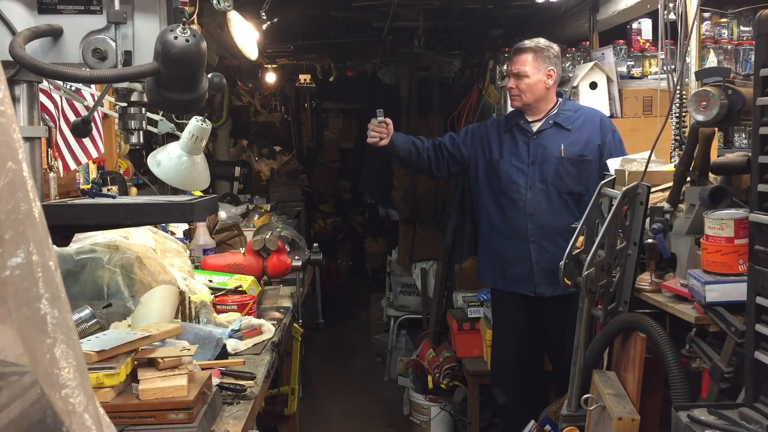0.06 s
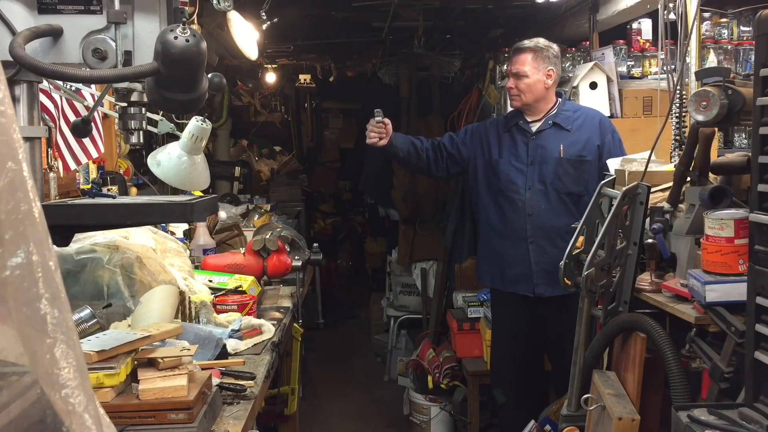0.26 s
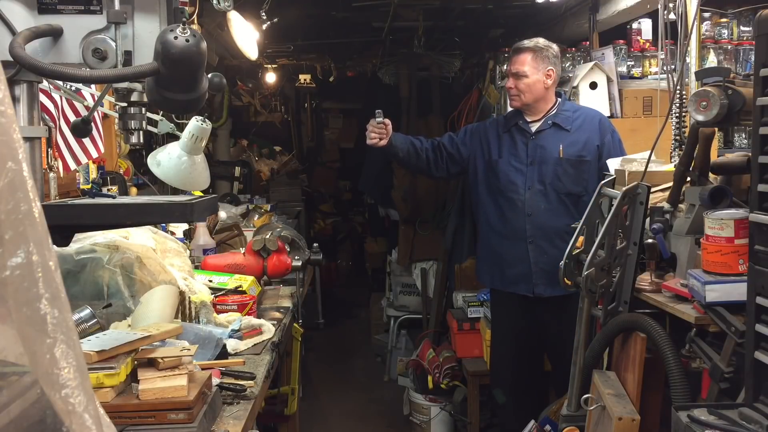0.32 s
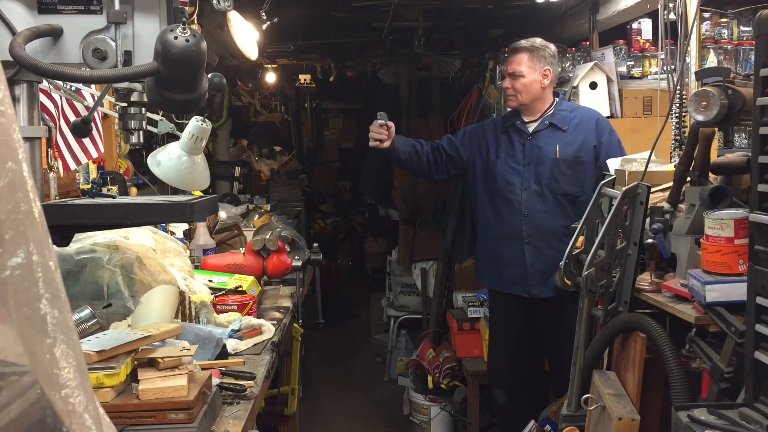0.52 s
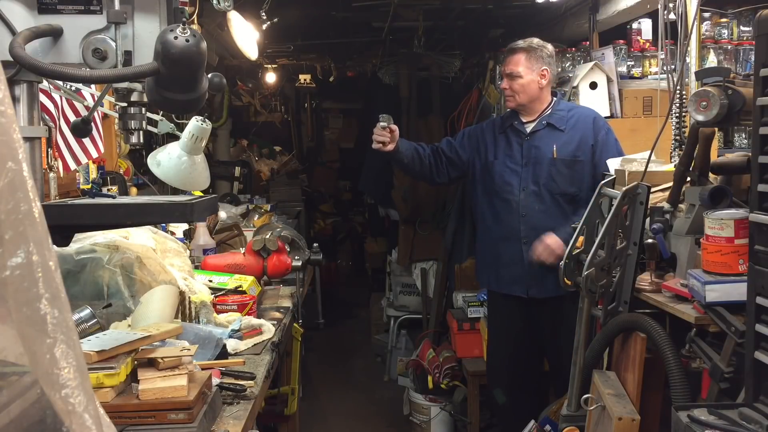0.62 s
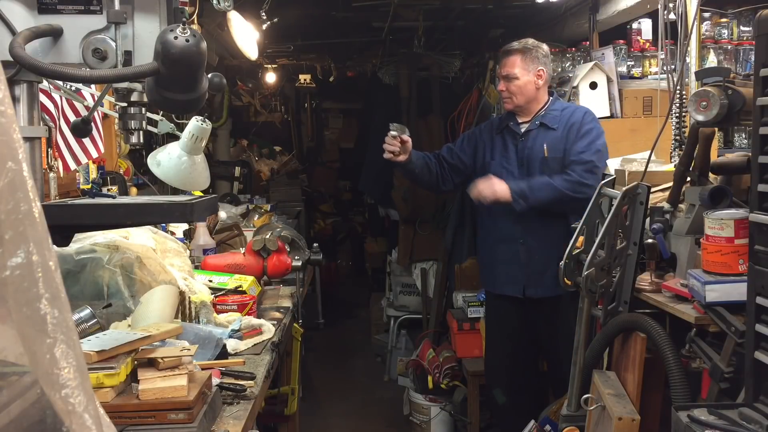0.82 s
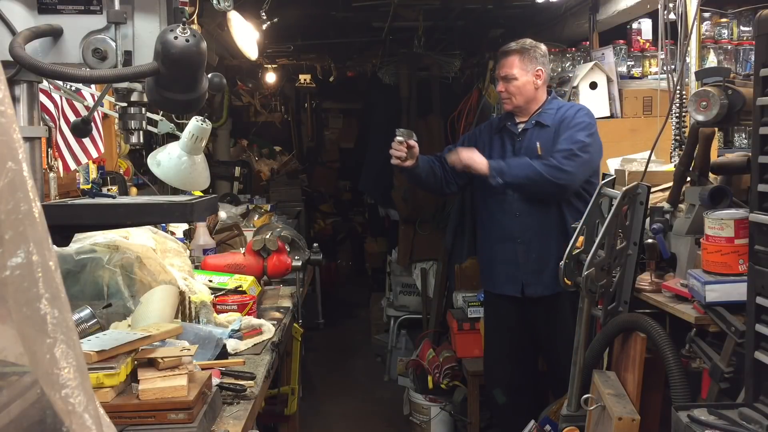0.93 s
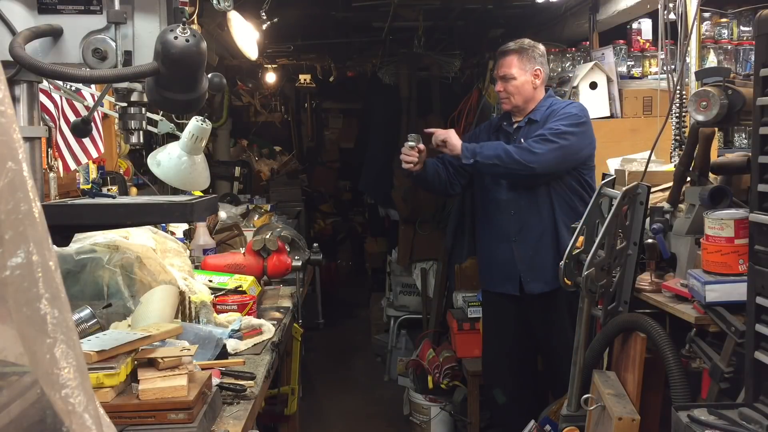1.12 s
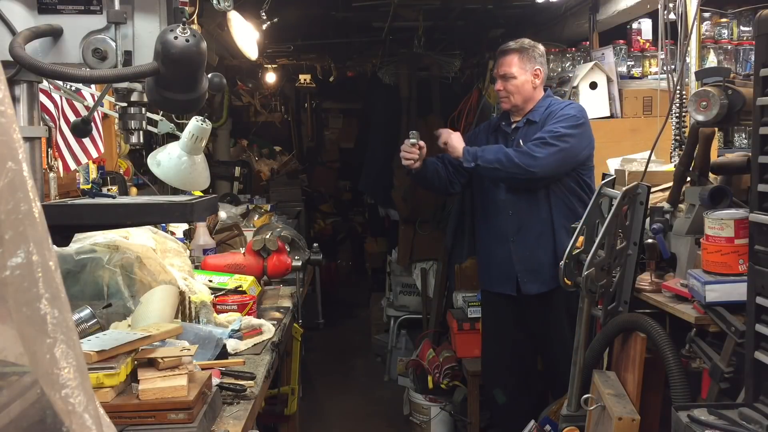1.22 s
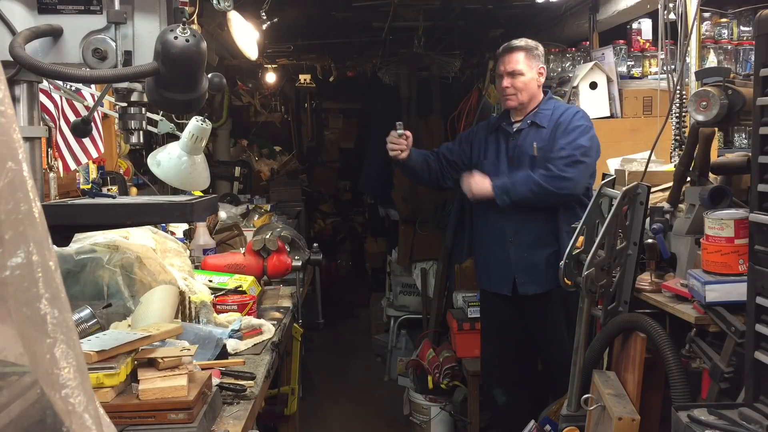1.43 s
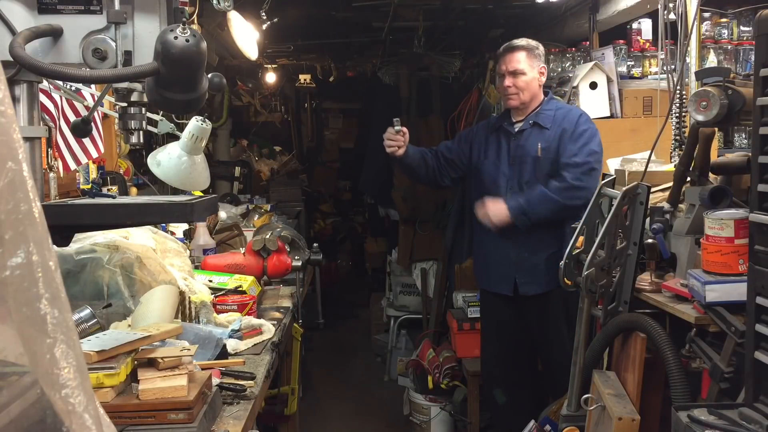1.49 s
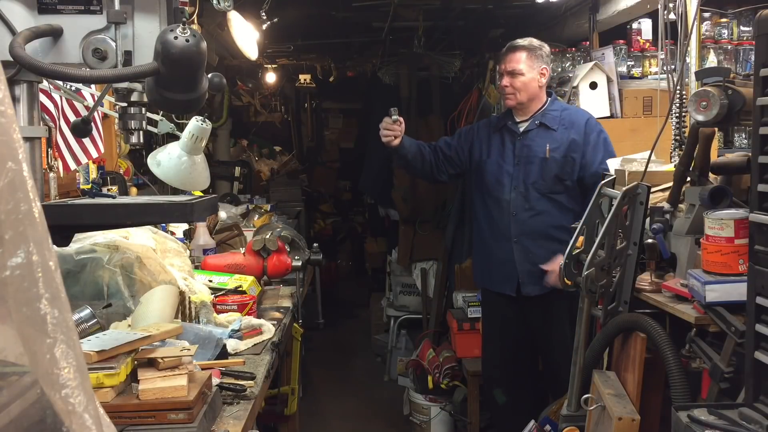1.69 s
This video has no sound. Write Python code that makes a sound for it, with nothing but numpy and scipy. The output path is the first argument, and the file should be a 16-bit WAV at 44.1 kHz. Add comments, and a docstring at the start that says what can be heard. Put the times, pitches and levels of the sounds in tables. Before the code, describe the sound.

One loud, sharp toy pistol pop, followed by a light trigger click indoors.

```python
"""A toy air pistol bursts its paper strip.

In a cluttered workshop, over a low rumble and faint hiss, the trigger rubs and ticks as it is squeezed.
The catch slips, the spring drives the piston, and the paper bursts with a pop that reverberates
and overloads the microphone. The trigger slides back and clicks home; a sleeve brushes."""
import sys
import numpy as np
from scipy import signal
from scipy.fft import rfft, irfft
from scipy.io import wavfile

SR = 44100
rng = np.random.default_rng(int(sys.argv[2]) if len(sys.argv) > 2 else 0)


def to_wav(s):
    """Save 16-bit WAV."""
    ch = np.atleast_2d(s).T  # columns
    pcm = np.round(np.clip(ch, -1, 1) * 32767)  # PCM
    wavfile.write(sys.argv[1], SR, pcm.astype(np.int16))


N = 77175
TIME = np.arange(N) / SR
FREQS = np.maximum(np.fft.rfftfreq(N, 1 / SR), 1)
POP_S = .2087

# Colour of the shot's reverberation. Each row: frequency in Hz, relative spectral density in dB.
REVERB_SPECTRUM = [(200, -14), (450, -14.5), (900, -10.5), (1300, -9.5), (1800, -3), (2600, -2),
                   (3600, 1.5), (5000, 2), (7500, 6), (9200, 3), (10500, -8), (13000, -5), (16000, -16.5)]


def from_db(db):
    """Amplitude grows tenfold for every 20 dB."""
    return 10 ** (np.asarray(db) / 20)


def level(points):
    """Gain over time, interpolated in decibels between (seconds, dB) points."""
    return from_db(np.interp(TIME, *np.transpose(points)))


def unit_rms(x):
    """Normalisation to a mean power of 1."""
    return x / np.sqrt(np.mean(x ** 2) + 1e-20)


def noise(spectrum):
    """Spectral shaping: white noise coloured by (Hz, dB) points, at rms 1."""
    hz, db = np.transpose(spectrum)
    gain = from_db(np.interp(np.log(FREQS), np.log(hz), db))
    return unit_rms(irfft(rfft(rng.standard_normal(N)) * gain, N))


def burst(start, hold, t60):
    """Exponential decay: a sudden onset, a hold, then a fall of 60 dB every t60 seconds."""
    return (TIME >= start) * np.exp(-np.log(1000) * np.maximum(TIME - start - hold, 0) / t60)


def swell(start, attack):
    """First-order rise towards 1, with time constant attack in seconds."""
    return 1 - np.exp(-np.maximum(TIME - start, 0) / attack)


def gaussian(centre_s, width_s):
    """A Gaussian envelope: a smooth, symmetric rise and fall."""
    return np.exp(-((TIME - centre_s) / width_s) ** 2)


def resonator(x, hz, t60):
    """A damped mode: a unit impulse starts a decaying sine of amplitude 1."""
    radius = np.exp(-np.log(1000) / (t60 * SR))
    angle = 2 * np.pi * hz / SR
    return signal.lfilter([0, np.sin(angle)], [1, -2 * radius * np.cos(angle), radius ** 2], x + 1e-18)


def reverberation(start, spectrum, build_s):
    """A diffuse field: reflections build up, then each band decays at the room's own rate."""
    # Each row: band centre in Hz, reverberation time in seconds.
    decay_times = [(200, .1), (600, .125), (1400, .148), (3500, .137), (7000, .124), (10000, .113),
                   (13000, .102)]
    field = rfft(noise(spectrum))
    log_centres = np.log([hz for hz, _ in decay_times])
    tail = 0
    for weights, (_, t60) in zip(np.eye(len(decay_times)), decay_times):
        band = irfft(field * np.interp(np.log(FREQS), log_centres, weights), N)
        tail += band * burst(start, build_s, t60)
    return swell(start, build_s) * tail


def background():
    """Ambient noise: a low rumble and a faint hiss, which both sink after the pop and come back."""
    # Each row: time in seconds, level in dB.
    rumble_levels = [(0, -52.5), (.03, -43.5), (.065, -59.5), (.115, -42), (.29, -58.5), (.42, -66),
                     (.815, -60), (.84, -49.5), (.98, -45.5), (1.05, -49), (1.5, -48.5), (1.75, -48)]
    hiss_levels = [(0, -72), (.2, -70), (.38, -78.5), (.66, -77), (.9, -72), (1.1, -71.5), (1.75, -72)]
    # Each row: frequency in Hz, relative spectral density in dB.
    rumble_spectrum = [(20, -17.5), (35, -16), (58, 4.5), (75, 1), (105, -9.5), (180, -21.5), (270, -31.5),
                       (450, -44), (1000, -64)]
    hiss_spectrum = [(100, -7.5), (400, -3), (600, -6.5), (1030, -8), (1600, -9.5), (2600, -10),
                     (6000, -15.5), (9000, -17.5), (11000, -21), (15500, -23), (17000, -35)]
    return level(rumble_levels) * noise(rumble_spectrum) + level(hiss_levels) * noise(hiss_spectrum)


def sleeve():
    """Friction of cloth: one soft brush as the arm comes in."""
    # Each row: frequency in Hz, relative spectral density in dB.
    cloth_spectrum = [(40, -22), (100, -7), (180, 2.5), (350, -16), (800, -25), (1400, -16), (2500, -24),
                      (8000, -41)]
    return from_db(-64) * noise(cloth_spectrum) * gaussian(centre_s=.807, width_s=.017)


def trigger_rub():
    """Sliding friction: grainy noise as the trigger goes in and back, and a squeak late in the squeeze."""
    # Each row: time in seconds, level in dB.
    squeeze = [(0, -66), (.06, -69.5), (.1, -63), (.14, -59), (.168, -50.5), (.186, -47), (.208, -45.5)]
    release = [(.468, -55), (.476, -55.5), (.495, -64), (.51, -63.5), (0.529, -65), (0.543, -53),
               (.56, -66.5)]
    # Each row: frequency in Hz, relative spectral density in dB.
    friction_spectrum = [(100, -30.5), (400, -19), (950, -17.5), (1400, 2), (2000, 2), (2900, -11.5),
                         (4500, -15), (6100, -10), (8000, -14), (14000, -14), (16000, -20)]
    strokes = 0
    for stroke in (squeeze, release):
        start, end = stroke[0][0], stroke[-1][0]
        strokes += level(stroke) * swell(start, attack=.0059) * burst(start, hold=end - start, t60=.1)
    grain_db, grain_s = 2.5, .00096
    grain = from_db(grain_db * np.interp(TIME / grain_s, np.arange(N), rng.standard_normal(N)))
    squeak_tone = unit_rms(resonator(rng.standard_normal(N), hz=2370, t60=.016))
    squeak = from_db(-47) * squeak_tone * gaussian(centre_s=.169, width_s=.009)
    return strokes * unit_rms(grain * noise(friction_spectrum)) + squeak


def trigger_clicks():
    """Impact excitation: each knock on the frame chatters and rings the trigger's modes and the room."""
    # Each row: start in seconds, level in dB, chatter hold in seconds, relative ring level in dB.
    knocks = [(0.068, -65, 0.0049, -27), (.116, -59, 0.0071, -18.5), (.173, -50, .006, -15),
              (0.468, -59.5, 0.00054, -9), (0.472, -50, 0.0017, -14), (.501, -60, .004, -21),
              (0.5451, -29, 0.0039, 2)]
    # Each row: frequency in Hz, relative spectral density in dB.
    chatter_spectrum = [(400, -18.5), (800, -10.5), (1350, -6.5), (2050, 2.5), (2550, -10.5), (3100, 2.5),
                        (3900, 2), (4800, -6), (6300, 1.5), (7050, 7.5), (7900, -5), (9500, -3.5),
                        (12500, -0.5), (16000, -5.5)]
    # Each row: frequency in Hz, gain in dB, time to decay by 60 dB in seconds.
    trigger_modes = [(1480, -22, .08), (1830, -16, .09), (2080, -14, .04), (3060, -12, .07),
                     (3677, -19, .12), (6541, -17, .1), (6858, -14, .115), (7031, -8, .078),
                     (7176, -16, .1), (12540, -17, .07)]
    room_db, low_cut_hz = -6.5, 1150
    contact = sum(from_db(db) * burst(start, hold, t60=.006) for start, db, hold, _ in knocks)
    chatter = contact * noise(chatter_spectrum)
    impulses = sum(from_db(db + ring_db) * (np.arange(N) == int(start * SR))
                   for start, db, _, ring_db in knocks)
    ringing = sum(from_db(db) * resonator(impulses, hz, t60) for hz, db, t60 in trigger_modes)
    room = sum(from_db(db + room_db) * reverberation(start, chatter_spectrum, build_s=.003)
               for start, db, _, _ in knocks)
    low_cut = signal.butter(3, low_cut_hz, "high", fs=SR, output="sos")
    return signal.sosfilt(low_cut, chatter + ringing + room)


def piston():
    """Release of spring energy: the catch slips and the piston's rush swells until the paper gives."""
    # Sharp snaps, the last a brief crackle leading into the pop. Each row: start in seconds, level in dB.
    onsets = [(.1856, -21), (.1932, -33.5), (.1968, -30.5), (.2068, -17.5)]
    # Each row: frequency in Hz, relative spectral density in dB.
    snap_spectrum = [(200, -5), (700, 2.5), (2000, 3), (4000, -3.5), (8000, -11.5), (16000, -18)]
    rush_spectrum = [(60, -5.5), (150, -0.5), (380, 3.5), (550, -4), (800, -7.5), (1300, -20), (3000, -21),
                     (9000, -35.5), (16000, -38.5)]
    room_db, rush_peak_db, rush_slope_db_per_s = -19.5, -20, 851
    snap_gain = sum(from_db(db) * burst(start, hold=0, t60=.005) for start, db in onsets)
    snaps = snap_gain * noise(snap_spectrum)
    room = sum(from_db(db + room_db) * reverberation(start, REVERB_SPECTRUM, build_s=.0015)
               for start, db in onsets)
    released = TIME > onsets[0][0]
    rush_gain = released * from_db(rush_peak_db - rush_slope_db_per_s * np.abs(POP_S - TIME))
    return snaps + room + rush_gain * noise(rush_spectrum)


def paper_pop():
    """Sudden rupture: the paper tears with a crack, heard with a low thump and the room's reverberation."""
    # Each row: frequency in Hz, relative spectral density in dB.
    crack_spectrum = [(150, -1), (280, -2), (420, 3.5), (680, 9.5), (1100, -0.5), (2200, 0), (4000, -6),
                      (8000, -2), (12000, -8.5), (16000, -15.5)]
    crack = from_db(3) * noise(crack_spectrum) * burst(POP_S, hold=.0053, t60=.014)
    # The pop's low thump dies away quickly as its pitch sinks.
    start_hz, end_hz, sink_s = 322, 45, .0048
    age = np.maximum(TIME - POP_S, 0)
    cycles = end_hz * age + (start_hz - end_hz) * sink_s * swell(POP_S, sink_s)
    envelope = swell(POP_S, attack=.003) * burst(POP_S, hold=0, t60=.068)
    thump = -from_db(11) * envelope * np.sin(2 * np.pi * cycles)
    room = from_db(-5.5) * reverberation(POP_S, REVERB_SPECTRUM, build_s=.005)
    return crack + thump + room


def scene():
    """Superposition: the sources of one shot add to the background, in mono."""
    return (paper_pop() + piston() + trigger_clicks() + trigger_rub() + sleeve() + background())[None]


def record(dry):
    """Hard clipping: the pop overloads the microphone, then a steep low-pass cuts the top treble."""
    ceiling, cutoff_hz = .99, 15800
    low_pass = signal.ellip(10, .1, 80, cutoff_hz, fs=SR, output="sos")
    return signal.sosfilt(low_pass, np.clip(dry, -ceiling, ceiling))


dry = scene()
out = record(dry)
to_wav(out)
```